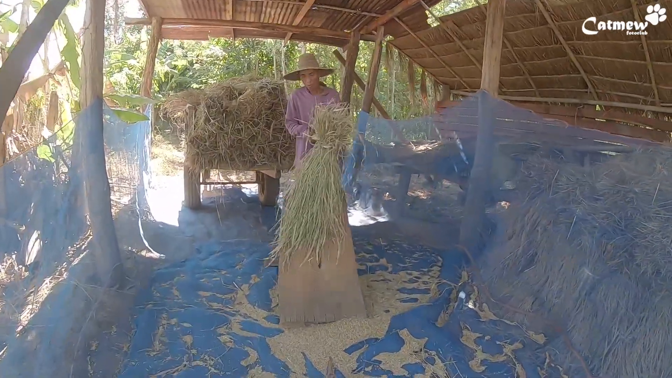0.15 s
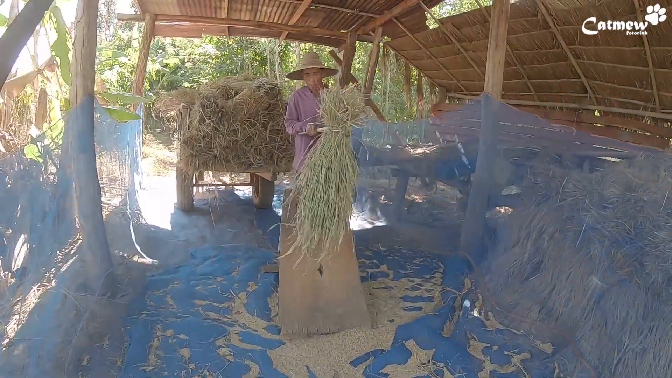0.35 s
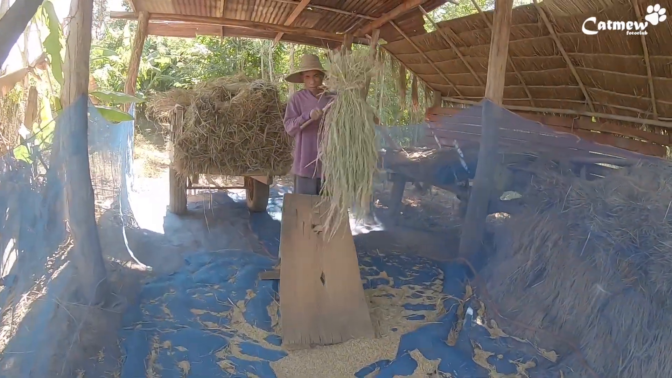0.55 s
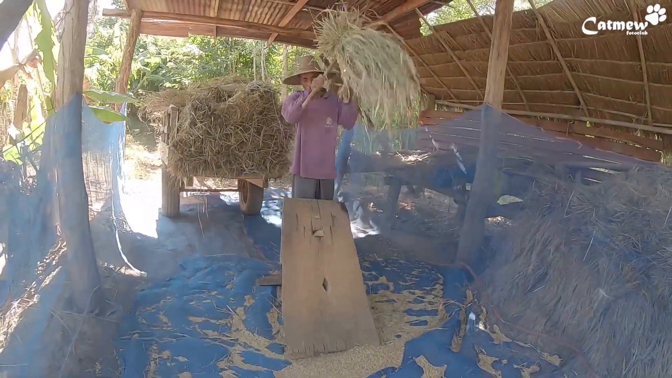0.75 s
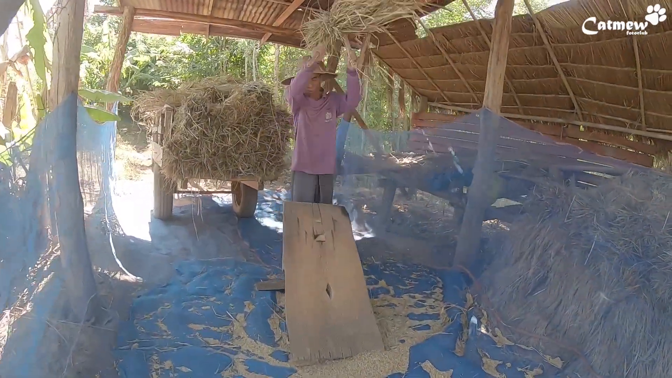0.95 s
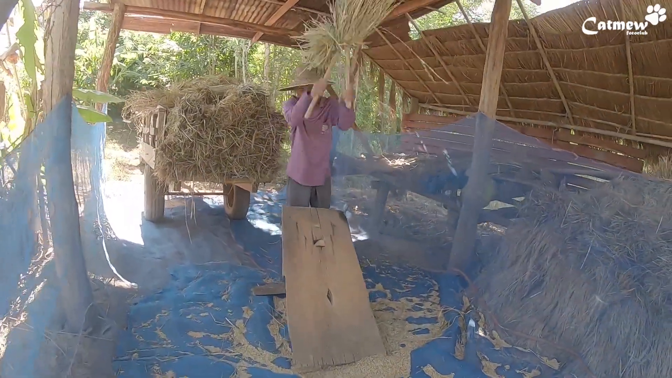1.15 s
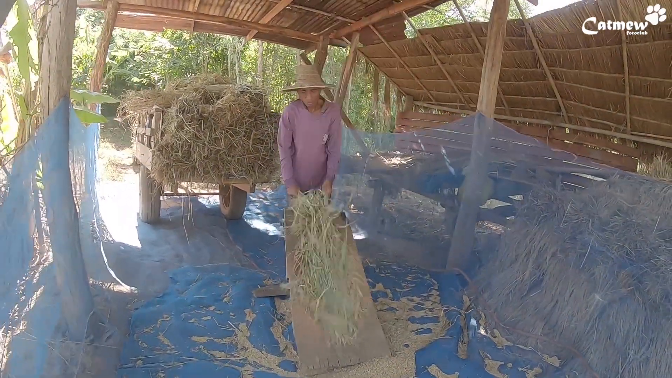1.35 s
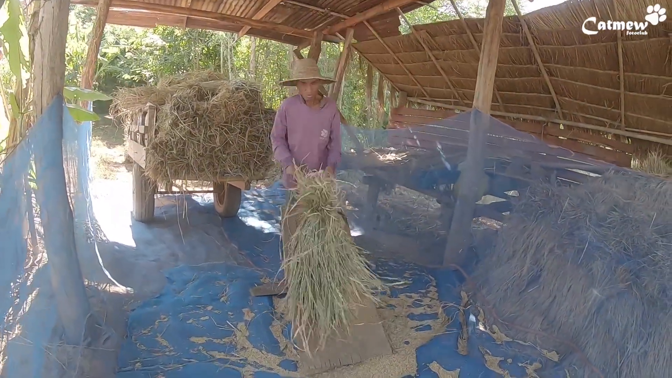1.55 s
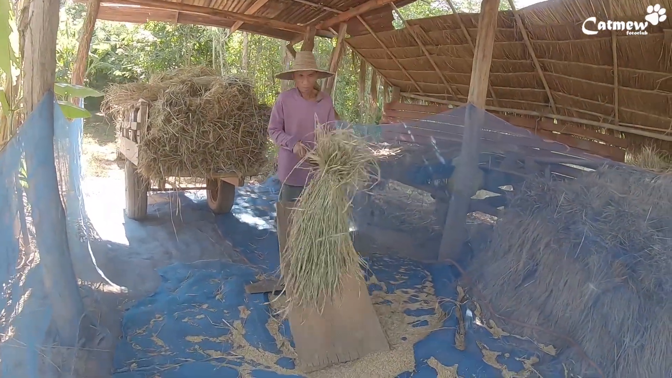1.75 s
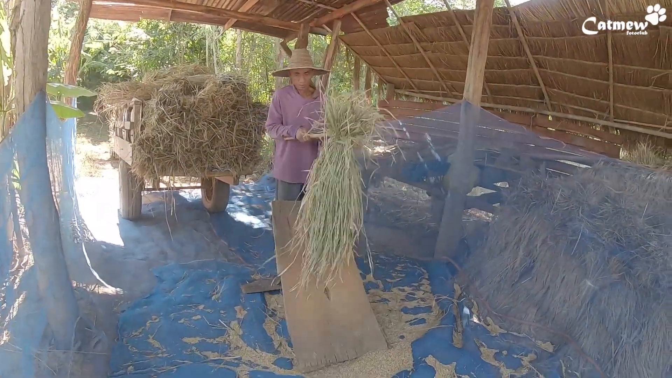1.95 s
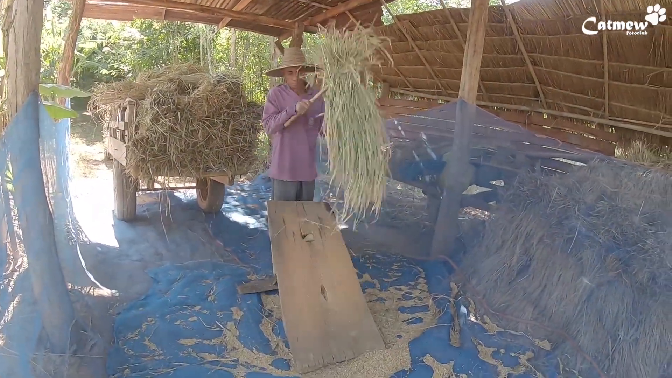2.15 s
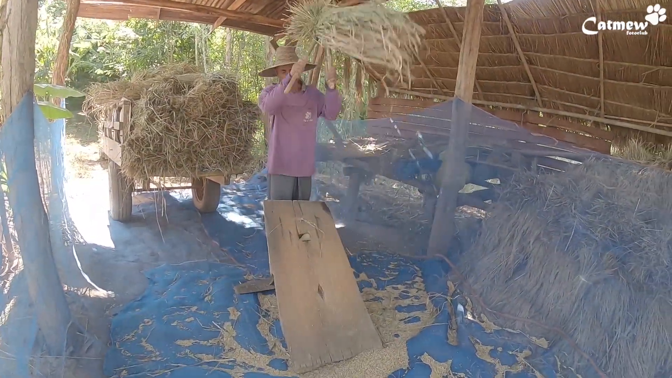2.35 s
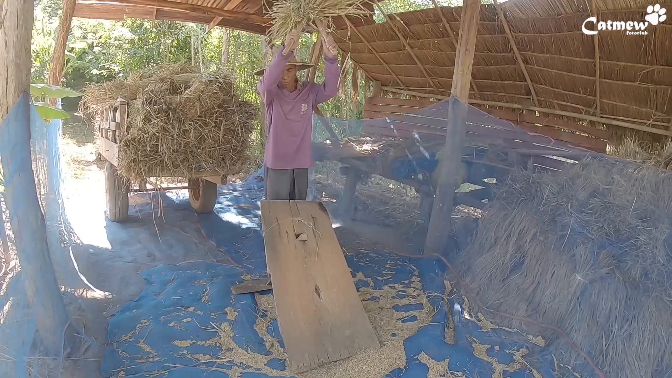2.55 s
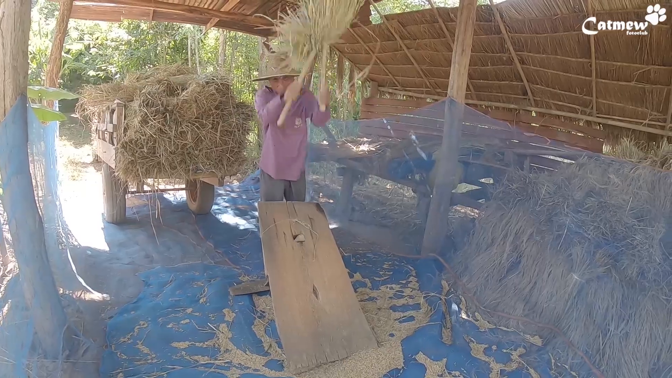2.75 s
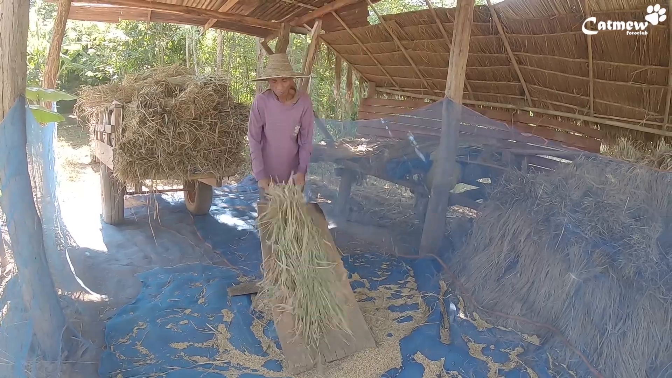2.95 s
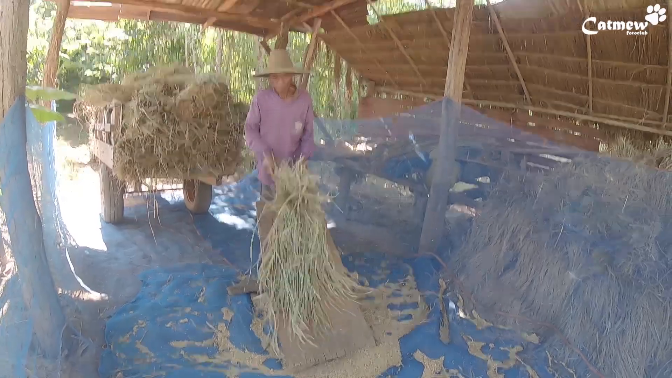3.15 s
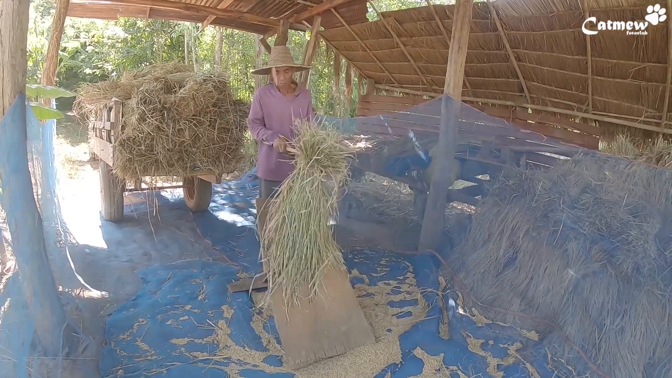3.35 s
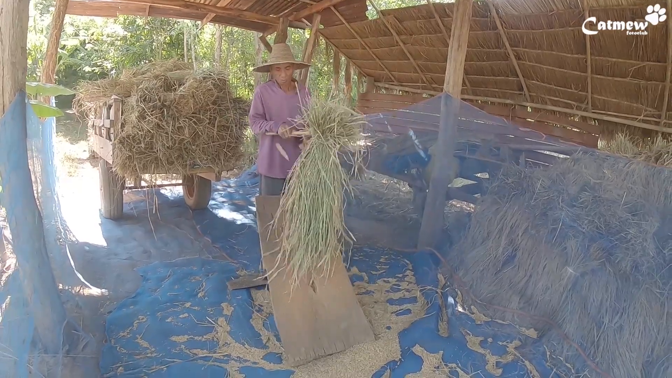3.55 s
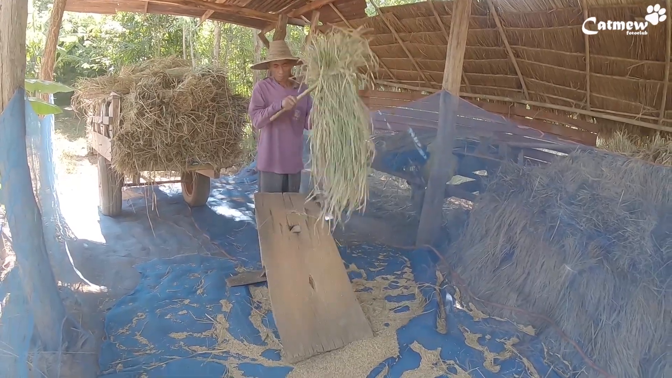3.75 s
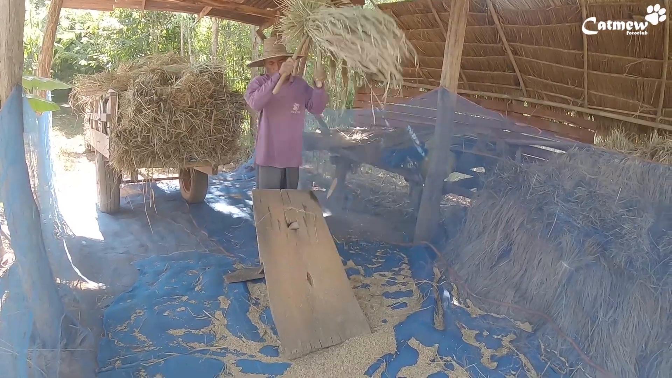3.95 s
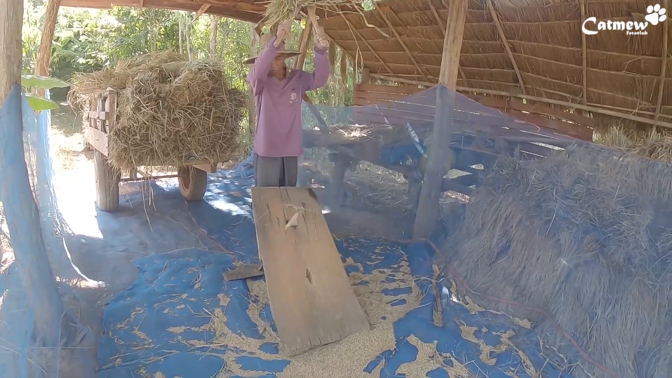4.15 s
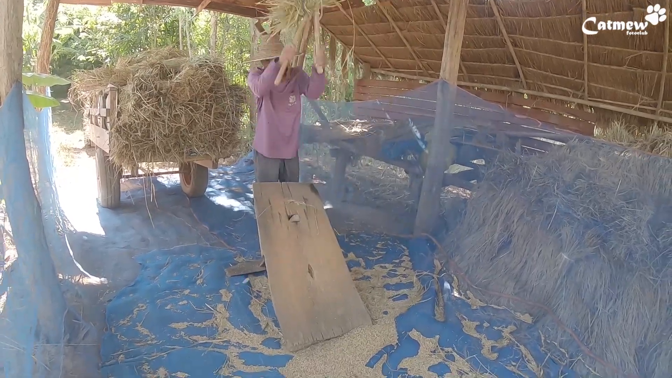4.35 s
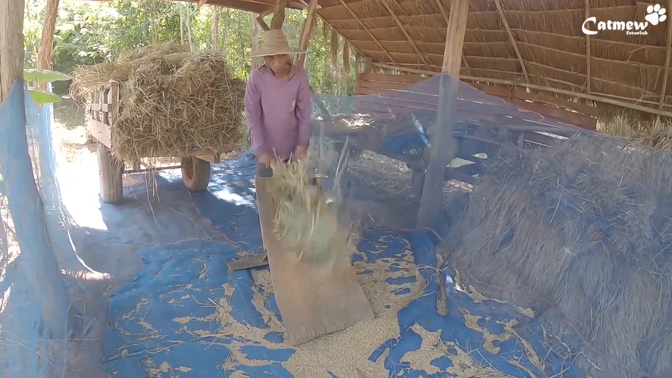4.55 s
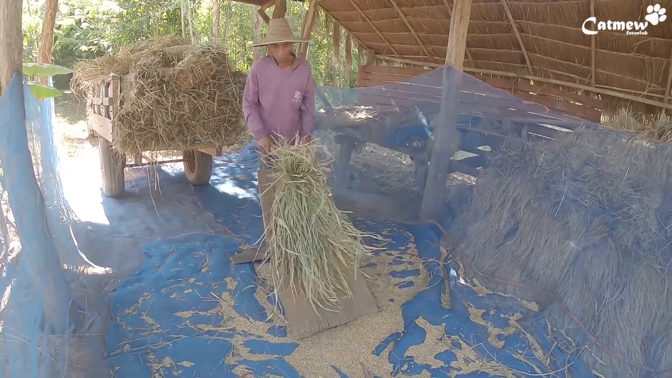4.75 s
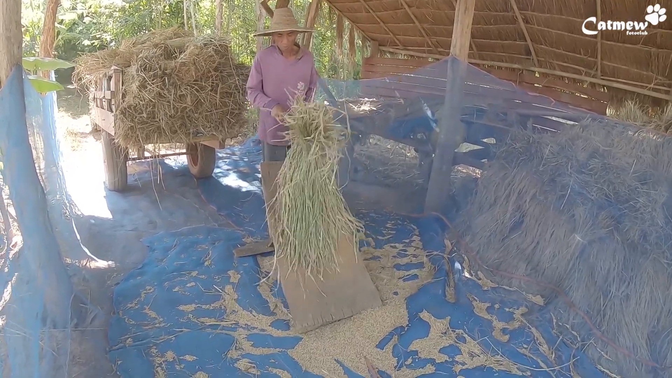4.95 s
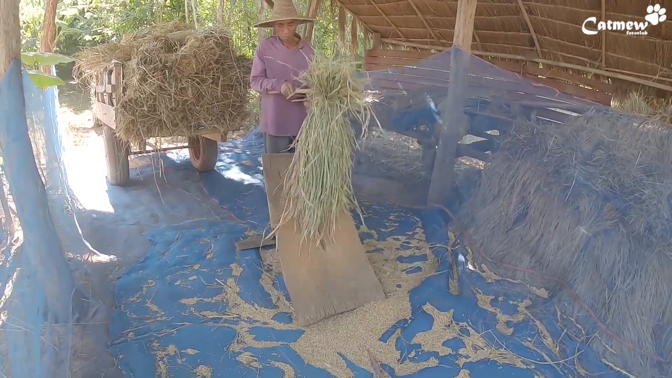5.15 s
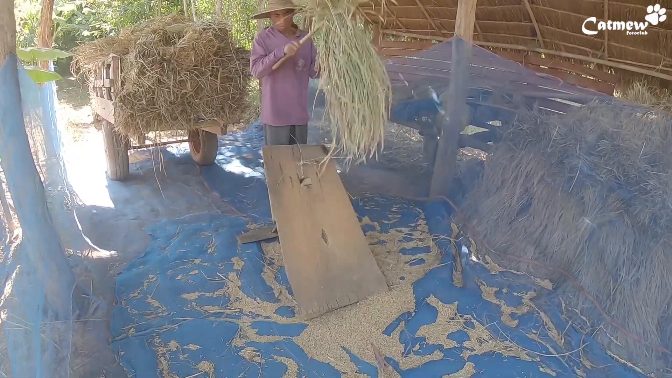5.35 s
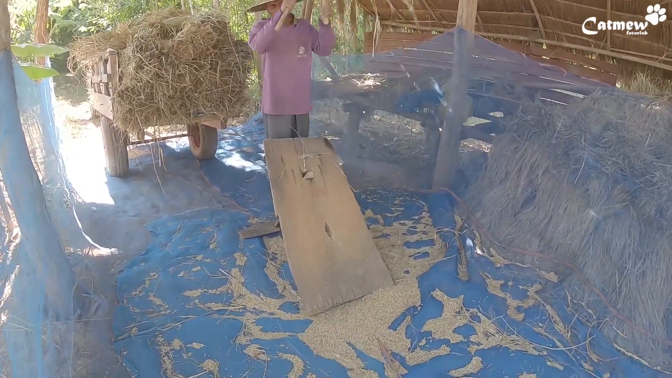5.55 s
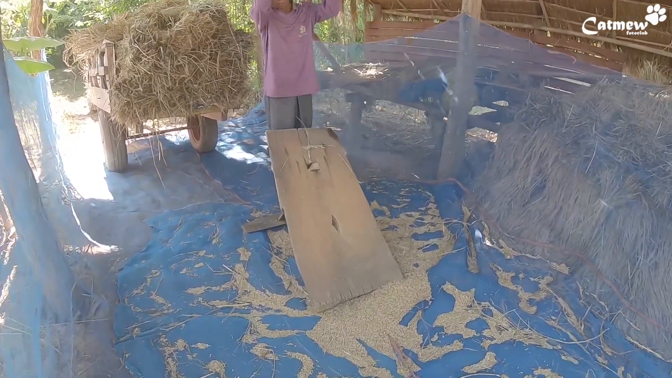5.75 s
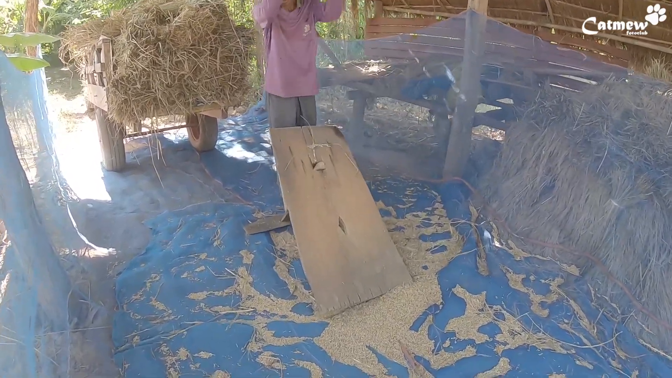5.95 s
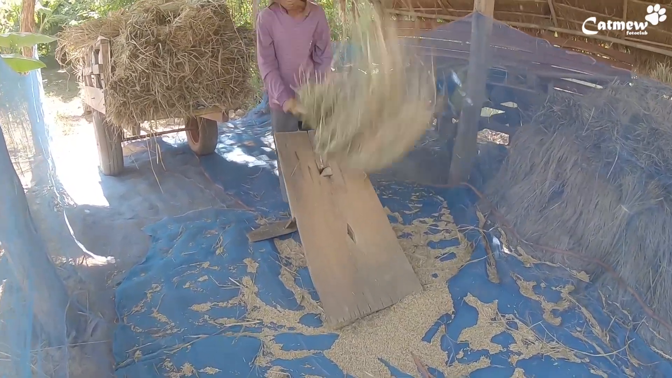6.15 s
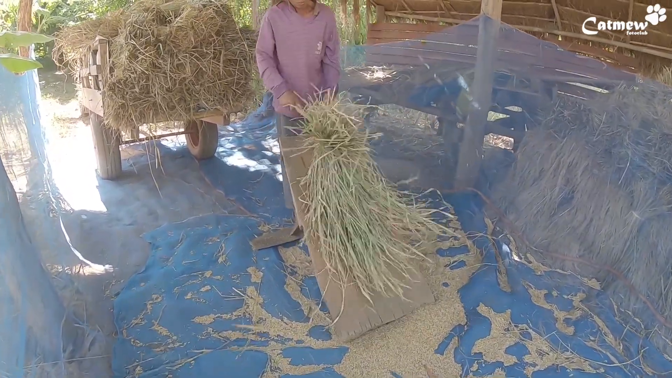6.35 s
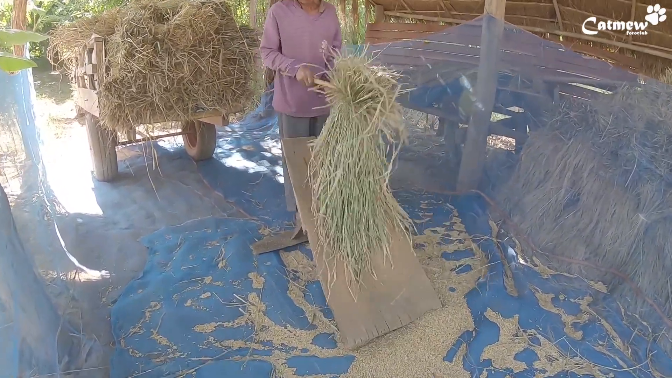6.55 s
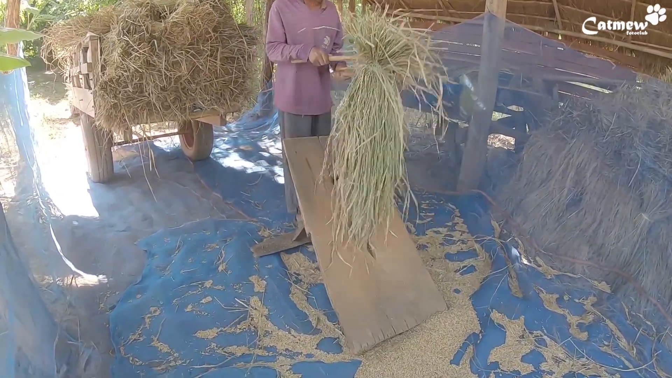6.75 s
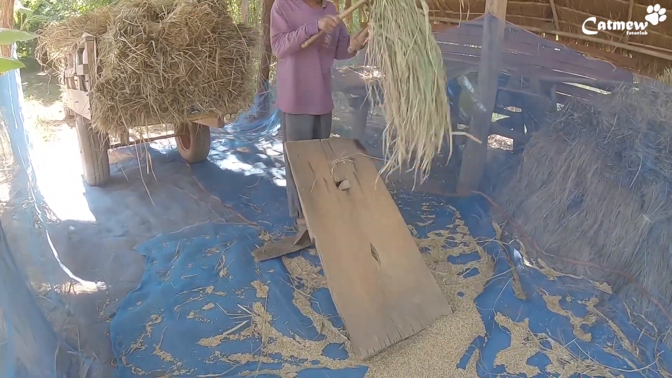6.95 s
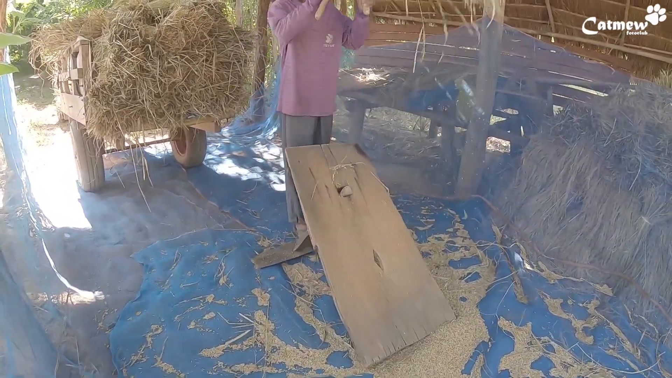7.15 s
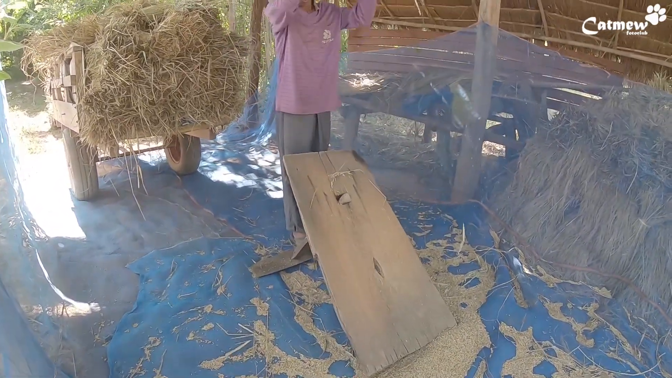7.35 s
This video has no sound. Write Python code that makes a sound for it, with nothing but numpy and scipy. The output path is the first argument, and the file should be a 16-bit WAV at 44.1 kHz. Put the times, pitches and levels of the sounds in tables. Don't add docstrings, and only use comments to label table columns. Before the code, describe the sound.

A person threshes rice by hand in an open shed. Dry straw rustles and small sticks click, then a swish swells into a heavy slap on a slanted wooden plank, which booms and rings briefly as grain sprays off. This repeats four times, about 1.6 seconds apart. A hand-held camera adds finger taps, rubbing and, near the end, low bumps over faint outdoor air.

```python
import sys
import numpy as np
from scipy import signal
from scipy.fft import rfft, irfft, next_fast_len
from scipy.io import wavfile
from scipy.ndimage import map_coordinates

SR = 44100
rng = np.random.default_rng(int(sys.argv[2]) if len(sys.argv) > 2 else 0)


def voltage_ratio(level):
    return 10 ** (np.asarray(level, float) / 20)


def materialize(psi):
    bounded = np.clip(np.atleast_2d(psi).T, -1, 1)
    quanta = np.round(bounded * 32767).astype(np.int16)
    wavfile.write(sys.argv[1], SR, quanta)


N = 326340
STEP = 32
CENTRE = np.array([[1], [0]])

# [start_s, peak_db, thud_db, knock_db, spray_db]
BLOWS = [
    (1.4635, -6, -9.5, -6.5, -9),
    (3.0466, -5, -9.5, -9, -7.5),
    (4.6848, -4, -6.5, -10, -19.5),
    (6.3095, -6, -6, -5, -9.5),
]
# [pitch_hz, level_db, t60_s]
PLANK_BENDS = [(159.5, -1.5, 0.13), (135.1, -3.5, 0.22), (184.8, -9, .18), (108, -12, 0.18)]
# [pitch_hz, level_db, t60_s]
PLANK_RINGS = [(253.7, 3.5, 0.17), (295, -0.5, 0.22), (366, -3.5, .37), (428, -10.5, 0.28), (477, -6, 0.2),
               (545, -7, 0.29), (572, 0, .07), (717, -3, 0.15), (603, -9, 0.24), (666.2, -7.5, 0.29),
               (785, -13, 0.23), (965, -8.5, 0.22), (1088, -11, 0.2), (1205, -9.5, .22)]
# [blow1_db, blow2_db, blow3_db, blow4_db]
SPOT_BENDS = [(0, -.5, .1, 1), (1, -.5, .1, 0.46), (-6, .5, .1, 1.5), (2, .1, .1, .1)]
# [blow1_db, blow2_db, blow3_db, blow4_db]
SPOT_RINGS = [(5, 6, 1, -0.5), (2.5, 3, -3.5, -0.2), (-.5, .1, 2.5, -6), (-1.5, 4.5, 2.5, 4.5),
              (-2.5, -3, 2, 2), (4, -9, 4, -1), (3.5, -11, 3, 9), (-2, 0, 4, -3), (-6, -4.5, -5, 3),
              (-3, 7.5, 9.5, 7), (-2.5, 3.5, 4, -4), (6, 2.5, -11, -5), (7.5, 1, 5, -4), (-5, 4, 6, -1)]
LOADING = (.01, .008, .006, .006)
# [delay_s, thud_db, knock_db]
REBOUNDS = [(.056, -15, -13), (.056, -10, -8.5), (.062, -10.5, -9), (.066, -15, -11)]
# [freq_hz, level_db per Hz]
SPRAY_COLOUR = [(100, -61), (200, 3.5), (400, -6.5), (700, -3.5), (1300, -3), (1900, -3), (2800, -0.5),
                (4200, -3), (5600, -5.5), (8000, -1.5), (9000, -8), (10300, -8), (11300, -18.5),
                (13000, -17), (15500, -29.5)]
# [at_800hz_db, at_4khz_db, stalks_keep_arriving_s]
SPRAY_SHAPE = [(-1.5, .5, .02), (-2.5, 0.6, 0.019), (-2, -1, 0.019), (0.5, 0.9, 0.022)]
# [freq_hz, t60_s]
SPRAY_FADE = [(250, 0.42), (700, 0.35), (2000, 0.28), (5000, 0.2), (9000, 0.22), (14000, 0.17)]
# [freq_hz, level_db per Hz]
TIPS_COLOUR = [(60, -40), (130, 3.5), (400, -7.5), (1000, -22), (4000, -28), (9000, -17.5), (12000, -57)]
# [freq_hz, level_db per Hz]
SMACK_COLOUR = [(300, -30), (600, -6), (1100, -5), (1700, -5.5), (2500, -0.5), (3600, -1), (5000, -9),
                (8000, -26)]
SMACK_LEVELS = (-8, -8, -9.5, -10)
# [freq_hz, level_db per Hz]
RATTLE_COLOUR = [(150, -30.5), (300, 0.5), (600, 0.5), (1000, -4.5), (1600, -12.5), (3000, -35.5)]
RATTLE_LEVELS = (-25, -23.5, -24, -25)

# [freq_hz, level_db per Hz]
STALKS_COLOUR = [(180, -39), (300, -11), (572, -9.5), (725, -7.5), (1050, -6), (1310, -5.5), (2300, -1),
                 (3260, .6), (7000, -9), (9100, -37), (15400, -120)]
# [freq_hz, level_db per Hz]
EARS_COLOUR = [(2000, -89.5), (3500, -14), (5000, -5), (6500, -3.5), (8300, -0.5), (9000, -6.5),
               (10300, -3), (11200, -19), (13000, -45.5), (15000, -88)]
# [freq_hz, level_db per Hz]
CHAFF_COLOUR = [(8000, -90.5), (9500, -29), (11500, -2), (13000, -1.5), (14500, -6), (15600, -12)]
# [start_s, ears_db, chaff_db]
TURNING = [(0, 0, -19), (.55, -1.5, -20), (1.2, 1, -17), (2.3, 2, -19), (2.85, 1, -17.5), (3.3, 1.5, -18.5),
           (3.55, -2.5, -16), (3.8, -10, -21.5), (4.4, -5.5, -20.5), (4.66, -7.5, -18), (4.85, -6.5, -15.5),
           (5.05, -8, -17), (5.4, -7, -16), (5.8, -6, -20), (6.3, -2.5, -16), (6.6, -0.5, -15.5),
           (7.05, -1, -16), (7.4, 3, -17)]
# [before_blow_s, level_db]
DOWNSWING = [(0, 0.5), (.06, -4.5), (.19, -9.5), (.32, -20.5), (.42, -45)]
# [end_level_db, length as a ratio of the usual]
SWISHES = [(-33.5, 0.98), (-33.5, 0.93), (-32, 0.94), (-34, 0.94)]
# [middle_s, level_db, half_length_s]
LIFTS = [(.08, -44.5, 0.19), (.72, -50.5, 0.18), (1.737, -46, .14), (2.2, -51.5, 0.22),
         (3.333, -44.5, 0.093), (3.855, -49.5, 0.16), (4.15, -56.5, 0.18), (5.025, -47, .14),
         (5.4, -51.5, 0.19), (5.75, -53, 0.11), (6.587, -46, 0.098), (6.9, -51, 0.19)]
# [start_s, peak_db, t60_s]
SHAKES = [
    (0.691, -26, 0.098),
    (2.385, -21.5, 0.25),
    (2.698, -25, 0.14),
    (3.699, -27.5, 0.1),
    (3.7963, -31, 0.12),
    (4.0203, -28, 0.12),
    (5.5615, -31, 0.13),
    (5.8694, -31, 0.12),
    (6.8194, -27, 0.036),
    (2.133, -28, .08),
]
# [start_s, peak_db, pitch_hz, t60_s]
STICKS = [(0.146, -33, 1660, 0.21), (0.214, -35, 1420, 0.11), (0.254, -34.5, 1280, 0.089),
          (0.532, -40, 1290, 0.09), (1.049, -36, 1600, 0.25), (1.209, -28, 1130, 0.082),
          (2.017, -42, 1680, 0.09), (2.133, -34.5, 1380, 0.1), (2.742, -25, 1090, 0.23),
          (4.461, -26, 1230, 0.051), (5.564, -38.5, 1700, 0.067), (5.87, -42, 1580, 0.076),
          (6.005, -37, 1320, 0.09), (6.819, -44, 1000, 0.1), (6.967, -38, 1535, 0.11)]

# [start_s, push_db, ring_db, push_length_s, shiver_db]
TAPS = [
    (3.2713, -4.5, -6, 0.0012, -23.5),
    (3.532, -6.5, -23, .0012, -23),
    (3.696, -20.5, -37, 0.0011, -31),
    (3.843, -30, -47, 0.0015, -32),
    (3.992, -21, -42, 0.00084, -27.5),
    (4.165, -47, -55, .0011, -46),
    (6.965, -36, -52, 0.00043, -53),
]
# [panel_db, knock_db, knock_hz]
TAP_CONTACTS = [(-27, -15, 1230), (-19.5, -20, 1100), (-35, -35, 1020), (-34, -45, 900), (-35, -36, 620),
                (-50, -56, 900), (-55, -49, 950)]
# [freq_hz, width_hz, level_db]
HOUSING = [(1420, 110, 0), (2550, 1400, -8.5), (4770, 700, -4.5), (6260, 1400, -6.5), (7750, 1300, -6.5)]
# [freq_hz, level_db per Hz]
SWAY_COLOUR = [(15, -7), (30, 6.5), (60, -0.5), (95, -7), (150, -51), (300, -120)]
# [freq_hz, level_db per Hz]
CREAK_COLOUR = [(40, -57), (80, -16), (115, -12), (150, 4.5), (220, -7.5), (300, -15), (450, -42),
                (900, -120)]
# [start_s, level_db]
GRIP = [(0, -73), (.55, -72), (.8, -82), (1.3, -82), (1.9, -75), (2.2, -66.5), (4.0, -59), (4.4, -64.5),
        (5.0, -63.5), (5.6, -65.5), (6.6, -65.5), (7.4, -63)]
# [middle_s, time_to_lose_10db_s, sway_db, creak_db]
SHIFTS = [(.03, 0.06, -65.5, -55.5), (.22, 0.06, -61, -56.5), (.36, 0.03, -57, -62), (.52, 0, -66, -60),
          (.7, .025, -53, -70), (1.42, .04, -72, -56), (1.82, .08, -75, -56), (2.14, 0.02, -49.5, -58.5),
          (2.27, .035, -52.5, -54), (2.43, 0.07, -41, -52), (2.7, 0.04, -41, -55), (2.87, 0.12, -60, -50),
          (3.92, 0.07, -60.5, -49), (4.17, 0.16, -54, -58), (4.47, 0.2, -59.5, -58),
          (4.62, 0.06, -37, -36.5), (5.24, 0.13, -52, -46.5), (5.31, .035, -31.5, -49),
          (5.74, 0.05, -41, -43.5), (5.8, .04, -44, -54), (5.96, .06, -46, -67), (6.14, 0.13, -39, -64),
          (6.45, 0.05, -42, -58), (6.86, .06, -37, -51), (6.99, .14, -37, -53), (7.15, 0.03, -36, -41),
          (7.22, 0.05, -32, -53)]
# [start_s, length_s, level_db, ring_hz]
RUBS = [(.16, .11, -50, 1300), (2.03, 0.11, -48.5, 1350), (2.26, .16, -51, 1270), (2.728, .05, -54, 1380),
        (3.46, .2, -53, 1400), (3.662, .3, -50.5, 1390), (3.998, 0.096, -46, 1450),
        (4.11, .36, -51.5, 1400), (4.94, .12, -57, 1380), (5.231, .12, -53.5, 1400),
        (5.72, 0.053, -53, 1250), (5.99, .12, -58, 1350), (6.95, .03, -52, 1380)]
# [start_s, peak_db, pitch_hz, t60_s]
THUMPS = [(0.342, -44, 40, 0.14), (0.39, -50, 42, 0.1), (0.689, -50, 45.8, 0.11), (2.408, -39, 45.8, 0.12),
          (2.654, -40, 45.8, 0.12), (5.284, -30, 132, 0.12), (5.319, -33, 53.8, 0.14),
          (5.692, -27, 89.5, 0.13), (6.109, -34, 49, 0.11), (6.874, -27, 70, .1), (7.01, -29, 40, 0.22),
          (7.146, -12, 54.6, .07), (7.185, -7.5, 58, 0.055), (7.211, -16, 50, .08),
          (7.227, -11.5, 65, 0.061), (7.257, -23, 35, 0.18)]
# [start_s, peak_db, pitch_hz, swell_s]
NUDGES = [(.247, -49, 210, .007), (.316, -56, 205, .007), (.48, -53, 800, .01), (.501, -45.5, 196, .007),
          (.54, -55, 310, .008), (.683, -56, 150, .004), (1.44, -43, 151, .012), (1.865, -53.5, 234, .007),
          (2.012, -57, 207, .007), (2.054, -54, 188, .008), (2.26, -47, 121, .007),
          (2.27, -46.5, 1240, .008), (2.388, -47, 1290, .007), (2.66, -39, 50, .01), (2.69, -50, 145, .01),
          (2.764, -48, 145, .015), (2.854, -43, 145, .015), (3.0, -39, 1450, .004), (3.908, -47, 170, .008),
          (3.905, -45.5, 320, .01), (3.99, -33, 335, .006), (4.05, -49, 300, .006), (4.087, -49, 164, .007),
          (4.158, -43, 188, .008), (4.236, -48, 180, .009), (4.451, -52, 172, .008),
          (4.604, -37, 110, .012), (4.645, -37.5, 420, .012), (4.66, -29.5, 130, .005),
          (4.664, -29.5, 1290, .002), (5.161, -44, 148, .01), (5.278, -39, 140, .008),
          (5.575, -53, 170, .007), (5.696, -40, 130, .007), (5.75, -48, 1250, .008), (6.27, -40, 200, .01),
          (6.015, -46, 1350, .006), (7.142, -34, 140, .006), (3.272, -27, 4700, .0008),
          (6.82, -41, 4800, .002), (3.692, -33.5, 350, .005), (3.528, -27, 370, .005),
          (3.531, -33.5, 560, .003), (3.84, -43, 340, .004), (3.088, -24, 366, .02),
          (6.314, -17, 680, .007)]

# [freq_hz, level_db per Hz]
AIR_COLOUR = [(60, -90), (130, -3.5), (220, 4), (400, -8), (600, -7.5), (1200, -2), (3000, -0.5),
              (8000, -6), (15000, -29.5)]
# [freq_hz, in_step, quarter_cycle_late, unrelated]
PORTS = [(40, .3, 0, .9), (150, .25, .3, 0.8), (600, 0.63, -0.6, 1), (1250, 0.08, -0.82, 0.93),
         (2500, 0, -0.52, 0.4), (4000, .07, 0.0046, 0.31), (6000, 0.32, .1, 0.55), (8000, 0.023, .12, 0.66),
         (10000, 0.25, .1, 0.9), (13000, .6, -.05, 0.55)]
# [start_s, below_4khz_db, above_4khz_db]
WIDTH = [(0, -.5, 2), (1.15, -1, -0.5), (1.5, -11, -10), (1.75, -16, -14.5), (2.3, -22, -18),
         (3.05, -25, -16), (3.4, -30, -16), (3.95, -21, -12), (4.5, -24.5, -17), (4.85, -39, -17),
         (5.15, -17, -7.5), (5.72, -4.5, -1), (5.95, -9.5, -4), (6.33, -18, -13.5), (6.75, -23.5, -16),
         (7.3, -29.5, -16)]


def unit(x):
    return x / np.sqrt(np.mean(x ** 2) + 1e-20)


def decay(t, t60):
    return voltage_ratio(-60 * t / t60)


def swell(t, rise):
    return 1 - np.exp(-t / rise)


def bell(x):
    return np.exp(-x ** 2)


def place(out, s, sound):
    out[..., round(s * SR):][..., :sound.shape[-1]] += sound


def along(points, hz):
    f, v = np.transpose(points)
    return np.interp(np.log(hz + 1), np.log(f + 1), v)


def curves(table):
    s, *cols = np.transpose(table)
    return [np.interp(np.arange(N) / SR, s, c) for c in cols]


def together(parts_db):
    total_db = 10 * np.log10(sum(voltage_ratio(db) ** 2 for db in parts_db))
    return np.interp(np.arange(N), np.arange(0, N, STEP), total_db)


def wobble(rate):
    knots = rng.standard_normal(int(N * rate / SR) + 4)
    return map_coordinates(knots, [np.arange(N) * rate / SR])


def filtered(x, response):
    m = next_fast_len(x.shape[-1] + 8192)
    return irfft(rfft(x, m) * response(np.fft.rfftfreq(m, 1 / SR)), m)[..., :x.shape[-1]]


def resonances(modes):
    return lambda f: sum((-1) ** k * voltage_ratio(db) * 1j * f * w / (c * c - f * f + 1j * f * w)
                         for k, (c, w, db) in enumerate(modes))


def crackle(spectrum, size, spread_db):
    scatter = voltage_ratio(spread_db * np.minimum(rng.exponential(size=size), 5))
    grains = rng.standard_normal((2, size)) * scatter
    return unit(filtered(grains, lambda hz: voltage_ratio(along(spectrum, hz))))


def ringing(modes, spot_db, t, rise, late_db, scatter_db, landing, again_s, again_db):
    first = sum((-1) ** k * voltage_ratio(db + spot_db[k]) * decay(t, t60) * np.sin(2 * np.pi * hz * t)
                for k, (hz, db, t60) in enumerate(modes))
    late = np.zeros(len(t))
    late[(rng.uniform(0, landing, 6) * SR).astype(int)] = voltage_ratio(rng.normal(late_db, scatter_db, 6))
    late[round(again_s * SR)] += voltage_ratio(again_db)
    return (first + signal.fftconvolve(first, late)[:len(t)]) * swell(t, rise)


def grain_spray(t, body_db, bright_db, hold, spray_db):
    hz, frames, z = signal.stft(crackle(SPRAY_COLOUR, size=len(t), spread_db=1.5), SR, nperseg=256)
    arriving = hold * along([(1000, 0.64), (2800, 0.46), (6000, 1.21)], hz)[:, None]
    after = np.maximum(frames - arriving, 0)
    tilt = [(800, body_db), (2200, .3), (4000, bright_db), (8000, spray_db + 5.5),
            (13000, 0.42 * spray_db + 1.5)]
    fade = decay(after, along(SPRAY_FADE, hz)[:, None])
    fade = fade + 0.51 * decay(after, 0.17) + .5 * decay(frames, 0.083)
    z = z * voltage_ratio(along(tilt, hz)[:, None]) * fade
    return signal.istft(z, SR, nperseg=256)[1][:, :len(t)] * swell(t, 0.003)


def blows():
    out, t = np.zeros((2, N + SR)), np.arange(SR // 2) / SR
    brush = 1300
    for k, (s, db, thud_db, knock_db, spray_db) in enumerate(BLOWS):
        again_s, thud_again_db, knock_again_db = REBOUNDS[k]
        spray = voltage_ratio(db - 9.5) * grain_spray(t, *SPRAY_SHAPE[k], spray_db)
        boom = ringing(PLANK_BENDS, np.transpose(SPOT_BENDS)[k], t, rise=LOADING[k], late_db=-9,
                       scatter_db=1.2, landing=.001, again_s=again_s, again_db=thud_again_db)
        ring = ringing(PLANK_RINGS, np.transpose(SPOT_RINGS)[k], t, rise=0.0043, late_db=-13.5,
                       scatter_db=4.5, landing=.035, again_s=again_s, again_db=knock_again_db)
        plank = voltage_ratio(db + knock_db - 6.5) * ring - voltage_ratio(db + thud_db + 1.3) * boom
        puff = crackle(SWAY_COLOUR, size=len(t), spread_db=5)
        puff = voltage_ratio(db - 15) * decay(t, 0.25) * swell(t, 0.013) * puff
        lumps = voltage_ratio(2.14 * wobble(67.6)[:len(t)])
        place(out, s, lumps * spray + (plank + puff) * CENTRE)
        tips = crackle(TIPS_COLOUR, size=brush, spread_db=3)
        start = round(s * SR)
        out[:, start - brush:start] += voltage_ratio(db - 22.5) * (t[:brush] / t[brush]) ** 2 * tips
    return out[:, :N]


def breaking_stems(t):
    life = np.arange(300) / SR
    when, size = rng.exponential(size=(70, 1)), rng.exponential(size=(70, 1))
    hz = 2580 * np.exp(.55 * rng.standard_normal((70, 1)))
    level = voltage_ratio(-18.5 + 3.5 * np.minimum(size, 3) - 9 * when)
    snaps = level * np.sin(2 * np.pi * hz * life) * np.exp(-life * hz / 2.8)
    start = np.minimum(when * .045 * SR, len(t) - 400).astype(int)
    at = start + np.arange(len(life))
    return np.bincount(at.ravel(), snaps.ravel(), len(t))


def smacks():
    out, t = np.zeros((2, N + SR)), np.arange(SR // 3) / SR
    rise = .024
    for (s, db, *_), smack_db, rattle_db, (late, *_) in zip(BLOWS, SMACK_LEVELS, RATTLE_LEVELS, REBOUNDS):
        smack = crackle(SMACK_COLOUR, size=len(t), spread_db=3)
        smack = voltage_ratio(smack_db) * decay(t, .075) * swell(t, .0015) * smack
        u = np.maximum(t - late + rise, 0) / rise
        shake = voltage_ratio(rattle_db + 2.5 * wobble(60.6)[:len(t)]) * u * np.exp(1 - u)
        rattle = shake * crackle(RATTLE_COLOUR, size=len(t), spread_db=3)
        place(out, s, voltage_ratio(db) * (smack + rattle + breaking_stems(t) * CENTRE))
    return out[:, :N]


def motion():
    t = np.arange(0, N, STEP) / SR
    before, swell_db = np.transpose(DOWNSWING)
    parts = [-54 + 0 * t]
    parts += [db - 10 * ((t - s) / half) ** 2 / 2 for s, db, half in LIFTS]
    for (s, *_), (db, stretch) in zip(BLOWS, SWISHES):
        downswing = db + np.interp((s - t) / stretch, before, swell_db)
        settling = -36 - 10 * (t - s) / .12
        parts.append(np.where(t < s, downswing, settling))
    return together(parts)


def straw():
    ears_db, chaff_db = curves(TURNING)
    flutter = motion() + .7 * wobble(14) + .8 * wobble(45)
    stalks = crackle(STALKS_COLOUR, size=N, spread_db=2.5)
    stalks = voltage_ratio(1.5 + flutter + .6 * wobble(30)) * stalks
    butts = filtered(stalks, lambda hz: 1 / (1 + (hz / 790) ** 4))
    stalks = stalks + (voltage_ratio(-2.5 - 0.67 * ears_db) - 1) * butts
    ears = crackle(EARS_COLOUR, size=N, spread_db=2.5)
    ears = voltage_ratio(ears_db + .6 + flutter + .6 * wobble(30)) * ears
    chaff = voltage_ratio(chaff_db + 4.9 + flutter) * crackle(CHAFF_COLOUR, size=N, spread_db=3.5)
    return stalks + ears + chaff


def shakes():
    out, t = np.zeros((2, N + SR)), np.arange(SR // 4) / SR
    colour = [(1500, -40), (3000, 0.5), (5000, 1.5), (8500, -0.5), (10500, -15), (13000, -40)]
    for s, db, t60 in SHAKES:
        shower = crackle(colour, size=len(t), spread_db=1.0)
        place(out, s, voltage_ratio(db - 15.5) * decay(t, t60) * swell(t, 0.0026) * shower)
    return out[:, :N]


def sticks():
    out, t = np.zeros(N + SR), np.arange(SR // 5) / SR
    for s, db, hz, t60 in STICKS:
        burst = rng.standard_normal(len(t)) * (decay(t, 0.017) + 1.05 * decay(t, t60))
        modes = [(hz, 0.49 * hz, 0), (2.47 * hz, 0.67 * hz, -5), (.5 * hz, 0.41 * hz, -9)]
        wood = filtered(burst, resonances(modes))
        wood = filtered(wood, lambda f: 1 / (1 + (f / 4000) ** 4) / (1 + (380 / (f + 1)) ** 6))
        place(out, s, voltage_ratio(db) * wood / np.abs(wood).max())
    return out[:N]


def taps():
    lead = .03
    out, t = np.zeros(N + SR), np.arange(SR // 10) / SR - lead
    u = t - .0028
    panel = resonances([(182, 128, 0), (355, 160, -3.5)])
    for (s, push_db, ring_db, length, shiver_db), (panel_db, knock_db, knock_hz) in zip(TAPS, TAP_CONTACTS):
        dent = -bell(u / length) + 0.3 * bell((u - .007) / 0.0065)
        dent = dent + 0.22 * bell((u + 0.0018) / 0.0012) - 0.077 * bell((u - .019) / .006)
        swing = -np.cos(2 * np.pi * 185 * u) * bell(u / 0.0088)
        shiver = unit(filtered(rng.standard_normal(len(t)), lambda f: panel(f) ** 2)) * bell(u / 0.0099)
        touch = swell(np.maximum(t, 0), 0.00022)
        contact = .25 * rng.standard_normal(len(t)) * touch * decay(np.abs(t), 0.0072)
        contact = contact + (np.abs(t) == np.abs(t).min())
        shell = np.sin(2 * np.pi * HOUSING[0][0] * t) * touch * bell(t / 0.0046)
        knock = np.sin(2 * np.pi * knock_hz * t) * bell((t - .0006) / 0.00098)
        snap = filtered(contact, resonances(HOUSING[1:]))
        snap = filtered(snap, lambda f: 1 / (1 + (f / 9500) ** 8))
        snap_db = 2.5 + 1.3 * ring_db
        tap = voltage_ratio(push_db - 0.6) * dent + voltage_ratio(panel_db) * swing + voltage_ratio(shiver_db - 4.5) * shiver
        tap = tap + voltage_ratio(ring_db) * shell + voltage_ratio(knock_db) * knock
        tap = tap + voltage_ratio(snap_db) * snap / np.abs(snap).max()
        place(out, s - lead, tap)
    return out[:N]


def handling():
    t, grip_db = np.arange(0, N, STEP) / SR, curves(GRIP)[0][::STEP]
    sway, creak = [grip_db], [-64 + .7 * (grip_db + 66)]
    rocks = [(s + 0.035, .04, -33.5 + .5 * db, -47 + .25 * db) for s, db, *_ in TAPS[:5]]
    for s, fall, sway_db, creak_db in list(SHIFTS) + rocks:
        sway.append(sway_db - 10 * np.abs(t - s) / fall)
        creak.append(creak_db - 10 * np.abs(t - s) / fall)
    slide = [-80 + 0 * t]
    for s, length, db, _ in RUBS:
        inside = np.minimum(t - s, s + length - t)
        slide.append(db + 10 * np.minimum(inside / 0.019, 0))
    return together(sway), together(creak), together(slide)


def hand():
    sway_db, creak_db, slide_db = handling()
    shell_hz = 1380
    sway = voltage_ratio(sway_db) * unit(voltage_ratio(2.2 * wobble(23)) * crackle(SWAY_COLOUR, size=N, spread_db=2))
    creak = voltage_ratio(creak_db) * unit(voltage_ratio(2.5 * wobble(27)) * crackle(CREAK_COLOUR, size=N, spread_db=1.5))
    shell = resonances([(shell_hz, 250, 0)])
    rub = unit(filtered(rng.standard_normal(N), lambda f: shell(f) ** 2))
    s, length, _, hz = np.transpose(RUBS)
    moved_hz = np.interp(np.arange(N) / SR, s + length / 2, hz) - shell_hz
    rub = np.real(signal.hilbert(rub) * np.exp(2j * np.pi * np.cumsum(moved_hz) / SR))
    return sway + creak + voltage_ratio(slide_db - 6.0 + .8 * wobble(24)) * rub * CENTRE


def scuff():
    stroke = np.interp(np.arange(N) / SR, [5.7, 5.71, 5.77, 5.8], [0, 1, 1.0, 0])
    shell = resonances([(414, 100, -3.5), (1290, 170, -2.5)])
    skin = unit(filtered(rng.standard_normal(N), lambda f: shell(f) ** 2))
    return voltage_ratio(-53) * stroke * skin * np.array([[1], [-2.2]])


def thumps():
    out, t = np.zeros(N + SR), np.arange(SR // 4) / SR
    for s, db, hz, t60 in THUMPS:
        turns = hz * (0.76 * t + 0.44 * .03 * swell(t, 0.025))
        place(out, s, voltage_ratio(db) * decay(t, t60) * swell(t, 0.0057) * np.sin(2 * np.pi * turns))
    return out[:N]


def nudges():
    out, t = np.zeros(N + SR), np.arange(SR // 8) / SR
    for s, db, hz, rise in NUDGES:
        place(out, s, voltage_ratio(db) * t / rise * np.exp(1 - t / rise) * np.sin(2 * np.pi * hz * t))
    return out[:N]


def air():
    return voltage_ratio(-56) * crackle(AIR_COLOUR, size=N, spread_db=-2.0)


def scene():
    middle = (sticks() + taps() + thumps() + nudges()) * CENTRE
    return blows() + smacks() + straw() + shakes() + middle + hand() + scuff() + air()


def roll_off(x):
    return signal.sosfilt(signal.butter(12, 15600, fs=SR, output="sos"), x)


def record(dry):
    port_hz, in_step, late, unrelated = np.transpose(PORTS)

    def share(v, hz):
        return along(np.transpose([port_hz, v]), hz)

    centre, cross = filtered(dry, lambda hz: hz < 15600)
    side = filtered(centre, lambda hz: share(in_step, hz) + 1j * share(late, hz))
    side = side + filtered(cross, lambda hz: share(unrelated, hz))
    low = filtered(side, lambda hz: hz < 4000)
    top = filtered(side, lambda hz: hz > 12000)
    low_db, high_db = curves(WIDTH)
    side = voltage_ratio(low_db) * low + voltage_ratio(high_db) * (side - low - top) + top
    x = np.array([centre + side, centre - side])
    x = x / (1 + np.abs(x / 1.1) ** 10) ** (1 / 10)
    return roll_off(x)


dry = scene()
out = record(dry)
materialize(out)
```